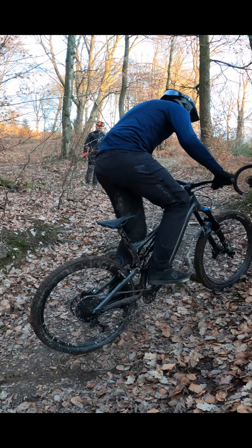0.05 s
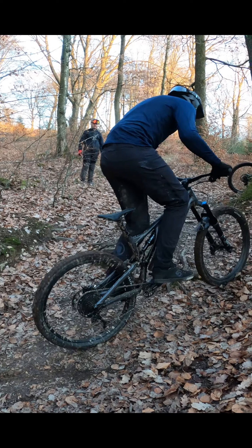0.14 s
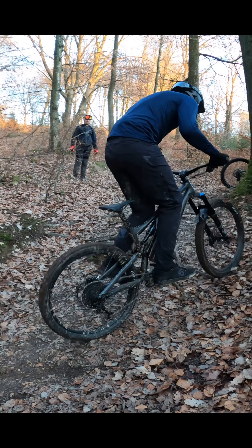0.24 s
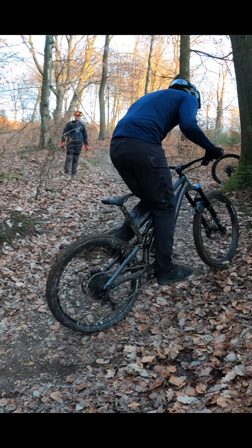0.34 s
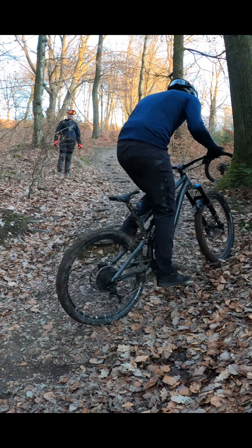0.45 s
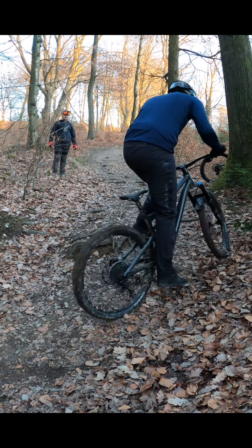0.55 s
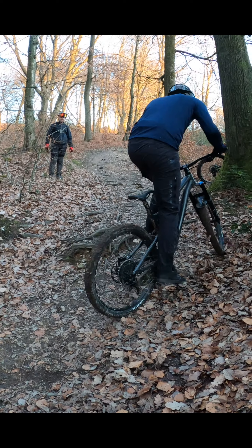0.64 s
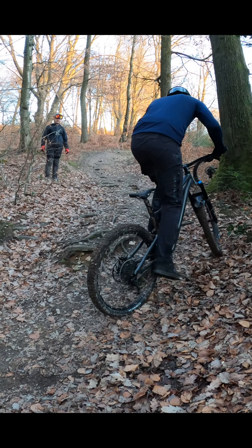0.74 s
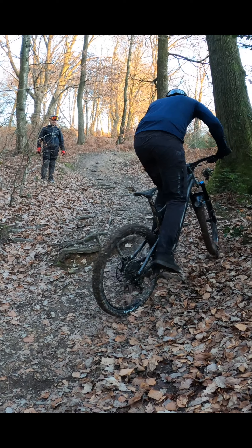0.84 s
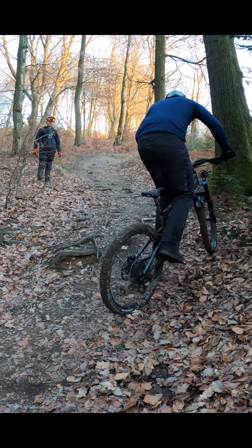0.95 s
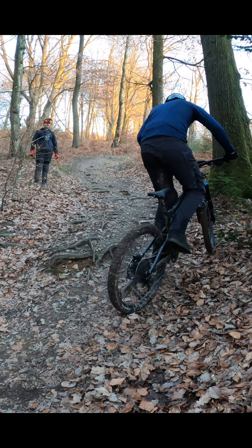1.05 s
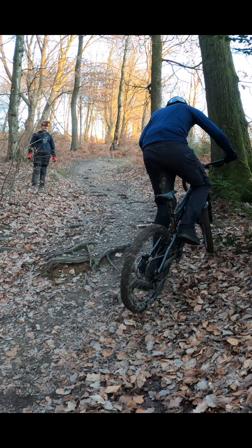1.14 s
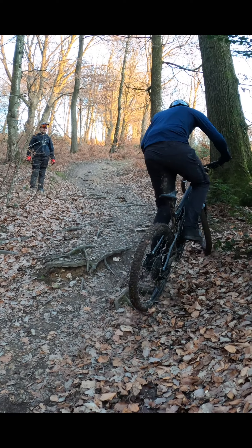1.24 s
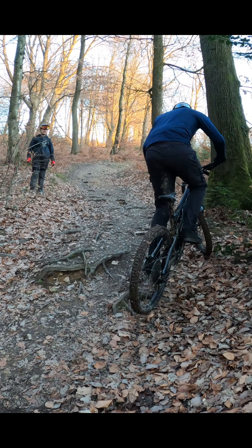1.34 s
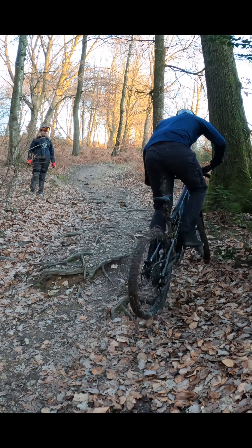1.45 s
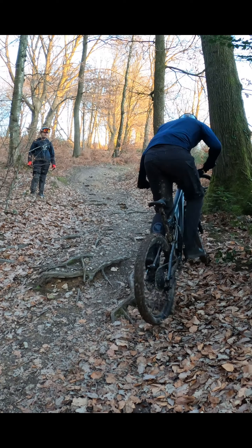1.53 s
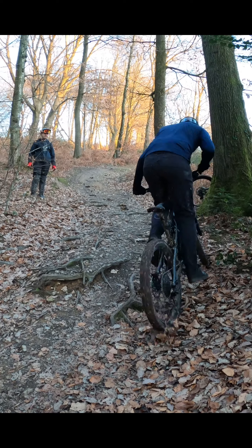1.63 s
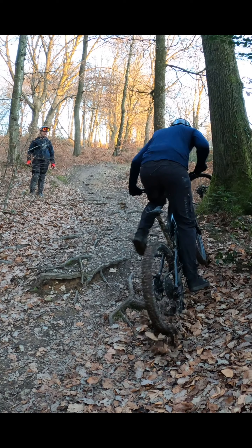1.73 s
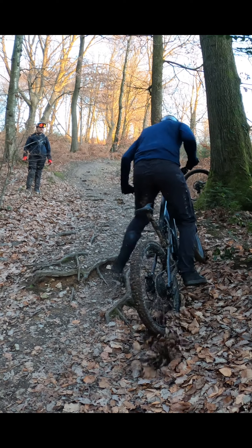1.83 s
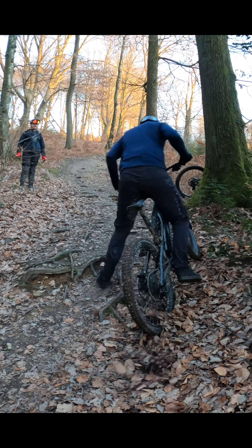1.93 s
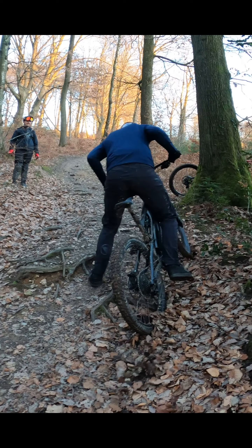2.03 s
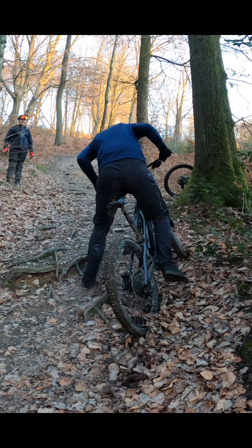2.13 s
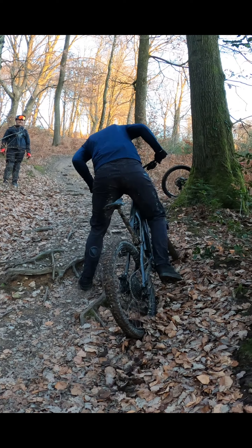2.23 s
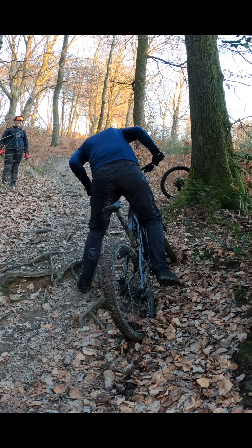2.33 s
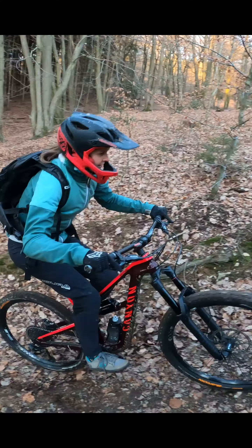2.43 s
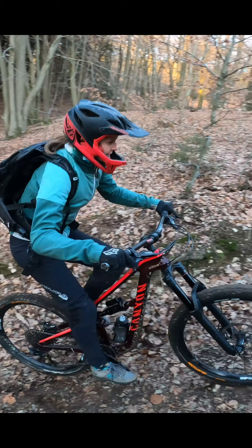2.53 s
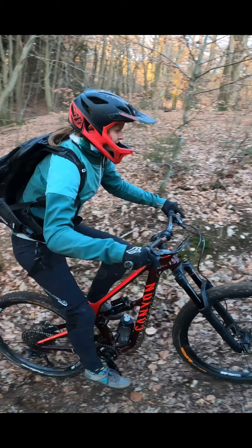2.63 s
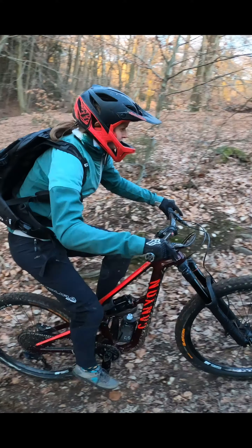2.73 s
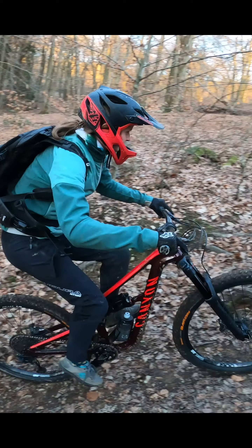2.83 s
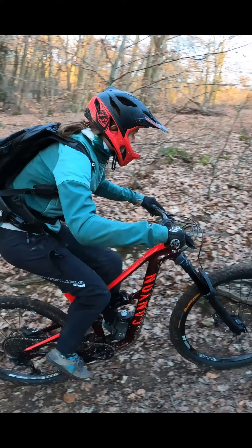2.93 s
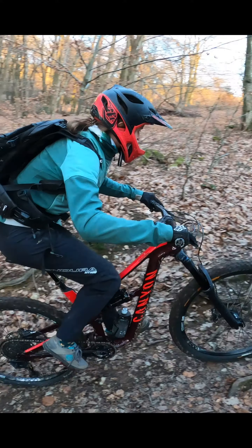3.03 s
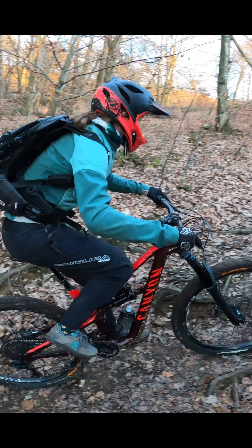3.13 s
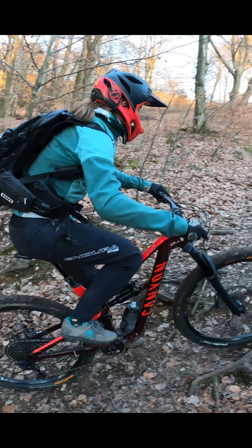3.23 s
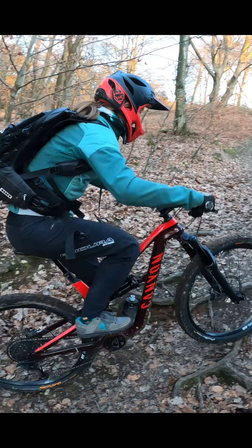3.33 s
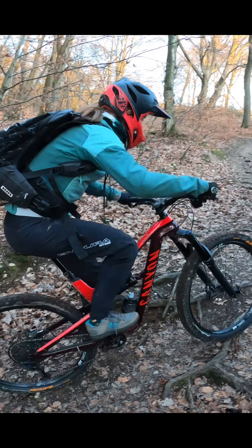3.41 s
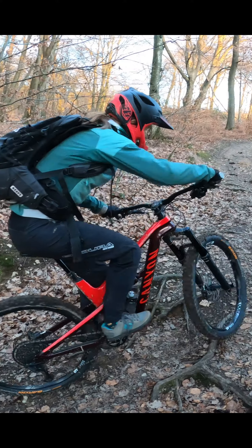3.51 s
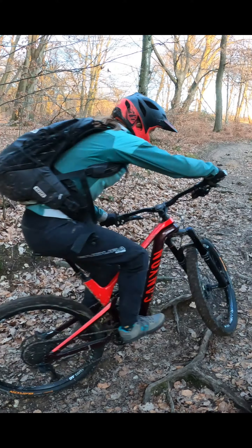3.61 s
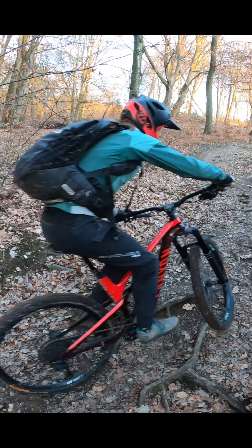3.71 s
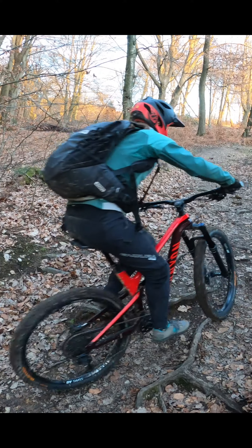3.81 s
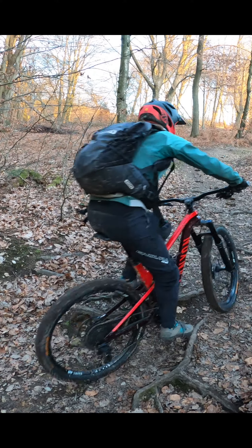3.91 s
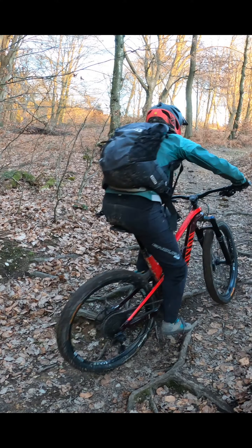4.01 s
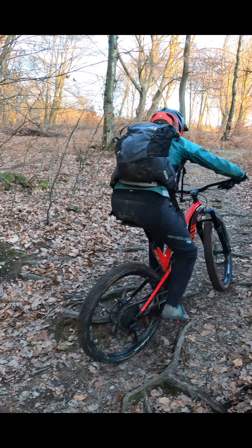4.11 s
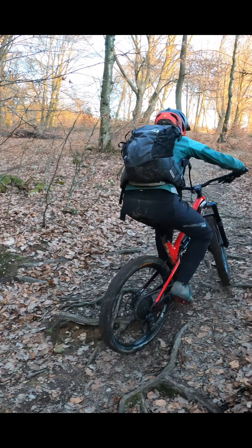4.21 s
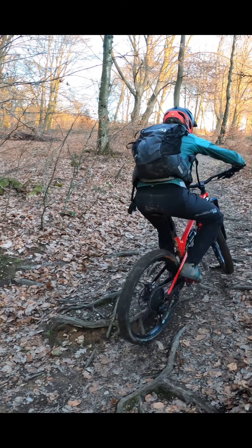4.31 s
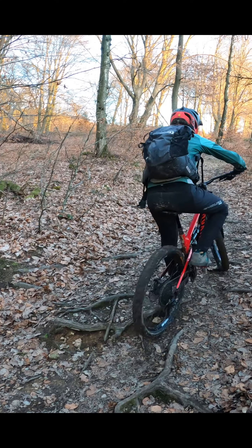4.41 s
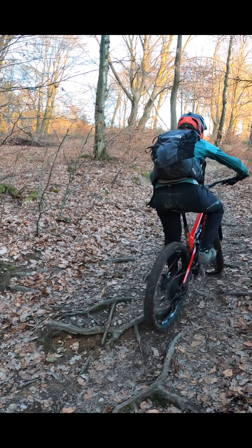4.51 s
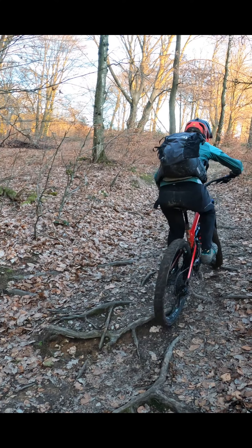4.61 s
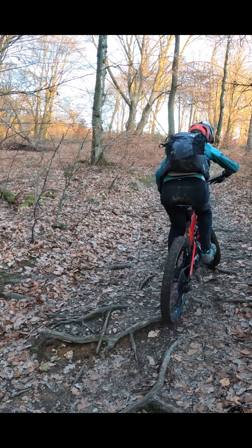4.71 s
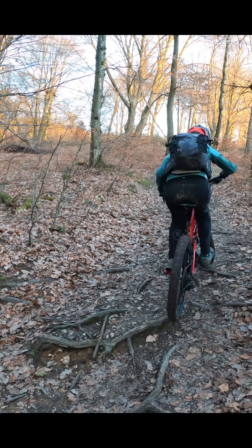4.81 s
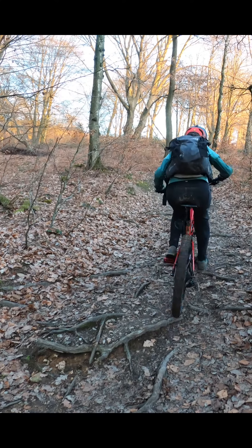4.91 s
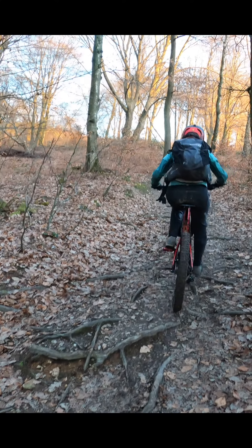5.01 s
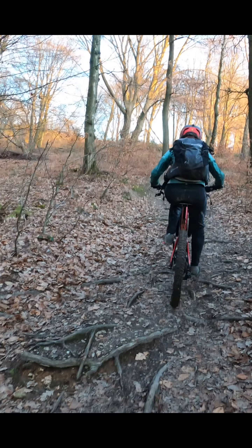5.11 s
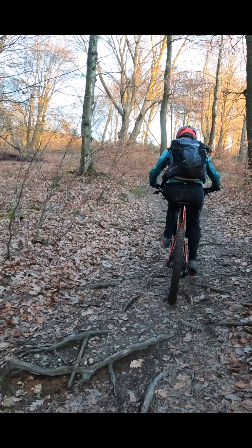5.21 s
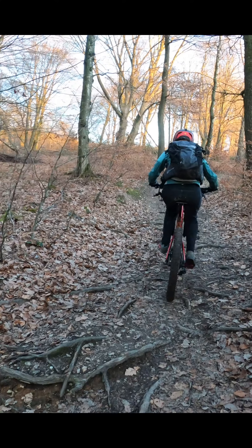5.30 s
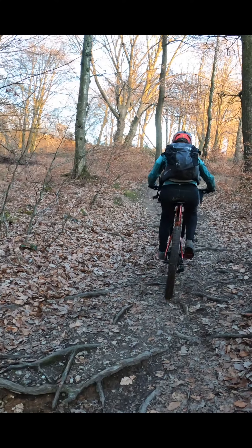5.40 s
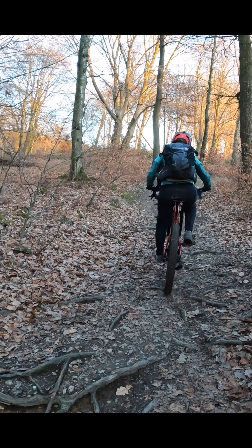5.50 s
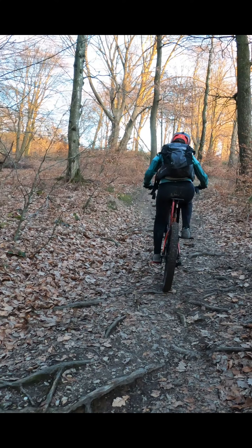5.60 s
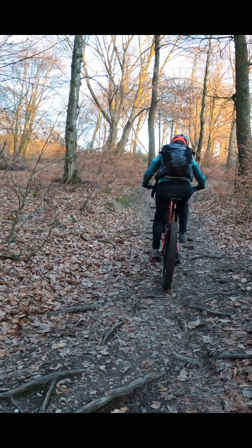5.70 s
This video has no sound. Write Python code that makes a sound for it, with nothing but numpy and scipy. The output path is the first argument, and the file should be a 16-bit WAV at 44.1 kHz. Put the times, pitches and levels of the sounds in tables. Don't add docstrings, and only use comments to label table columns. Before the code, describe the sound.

Close tyres crackle over dry leaves and dirt; a rear wheel slips with a drumming tear, then a second, quieter bike rolls past with snapping twigs.

```python
import sys
import numpy as np
from scipy import signal
from scipy.fft import rfft, irfft
from scipy.io import wavfile
from scipy.ndimage import uniform_filter1d

SR = 44100
rng = np.random.default_rng(int(sys.argv[2]) if len(sys.argv) > 2 else 0)


def digitize_waveform(pressure):
    field = np.atleast_2d(pressure).T
    bounded = np.clip(field, -1, 1)
    quanta = np.round(bounded * 32767).astype(np.int16)
    wavfile.write(sys.argv[1], SR, quanta)


def volts(x):
    e = np.asarray(x, float) / 20
    return 10 ** e


N = 253575
TIME = np.arange(N) / SR
SECOND = TIME >= 2.479
TOP_HZ = 15800


def evened(x):
    return x / np.sqrt(np.mean(x ** 2) + 1e-20)


def track(rows):
    s, *columns = np.transpose(rows)
    return [np.interp(TIME, s, c) for c in columns]


def fine(x):
    return np.interp(TIME * 1000, np.arange(len(x)), x)


def colour(x, points, lo_hz=0, hi_hz=3e4, fade=0.14):
    hz = np.fft.rfftfreq(len(x), 1 / SR) + 1
    f, db = np.transpose(points)

    def above(edge_hz):
        return np.clip(.5 + np.log(hz / (edge_hz + 1)) / (2 * fade), 0, 1)

    gain = volts(np.interp(np.log(hz), np.log(f + 1), db))
    return irfft(rfft(x) * gain * above(lo_hz) * (1 - above(hi_hz)), len(x))


def add(mix, s, sound):
    part = mix[round(s * SR):][:len(sound)]
    part += sound[:len(part)]


def ring(x, hz, width_hz):
    return signal.lfilter(*signal.iirpeak(np.clip(hz, 30, 2e4), max(hz / width_hz, .3), SR), x)


def steep_ring(x, hz, width_hz):
    return ring(ring(x, hz, width_hz), hz, width_hz)


def drift(first, second):
    return evened(uniform_filter1d(uniform_filter1d(rng.standard_normal(N), first), second))


def swell(start, length, attack, growth_db, release_db):
    t = np.arange(0, N / SR + .01, .001) - start
    grown = np.clip(t / max(length, .01), 0, 1) - 1
    decay_db = release_db * np.maximum(t - length, 0)
    return np.clip(t / max(attack, .002), 0, 1) * volts(growth_db * grown - decay_db)


def heap(bed, rows, level_db, shape):
    power = sum((volts(db) * swell(*row[:2], *shape)) ** 2 for row, db in zip(rows, level_db))
    return np.sqrt(bed ** 2 + fine(power))


def grains(per_s, spread_db, lo_hz, hi_hz, cycles, bed, clump_db, count=20):
    clump = drift(420, 260)
    size = volts(spread_db * np.minimum(rng.exponential(1, N), 4))
    size = size * (rng.random(N) < per_s / SR)
    kind, out = rng.integers(0, count, N), np.zeros(N)
    t = np.arange(300) / SR
    for k, hz in enumerate(np.geomspace(lo_hz, hi_hz, count)):
        crack = np.sin(2 * np.pi * hz * t) * np.exp(-t * hz / cycles)
        crack = crack / np.linalg.norm(crack) * np.sqrt(hz)
        out += signal.oaconvolve(size * (kind == k), crack)[:N]
    rustle = bed * rng.standard_normal(N)
    return evened((evened(out) + rustle) * volts(clump_db * clump))


def burst(t60, rise_s, tick):
    t = np.arange(4000) / SR
    decay = volts(-60 * t / max(t60, .005)) + tick * np.exp(-t / 0.00074)
    return rng.standard_normal(len(t)), np.minimum(t / rise_s, 1) * decay


def tone(rows, flutter_db, waver):
    hz, db = track(rows)
    flutter, wander = drift(200, 150), drift(200, 150)
    turns = np.cumsum(hz * (1 + waver * wander)) / SR
    sounding = (TIME > rows[0][0]) * (TIME < rows[-1][0])
    return np.sqrt(2) * volts(db + flutter_db * flutter) * np.sin(2 * np.pi * turns) * sounding


def pops(rows, least_cycles):
    out = np.zeros(N)
    for (s, db, hz), turn in zip(rows, rng.random(len(rows))):
        cycles = least_cycles * max(hz / 3500, 1) ** .5
        u = np.arange(4400) / SR * hz / cycles
        envelope = least_cycles / cycles * 2 * u * np.exp(1 - 2 * u)
        wave = np.sin(2 * np.pi * (u * cycles + turn))
        add(out, s - .5 * cycles / hz, volts(db - 5.0) * envelope * wave)
    return out


# f/Hz, level/dB
GUST_COLOUR = [(11, -44), (18, 0.5), (32, -3), (48, 1), (59, -6.5), (76, 5), (90, -12), (120, -42),
               (200, -120)]
# t/s, length/s, level/dB
GUSTS = [(0.0, 0.11, -44), (.48, 0.14, -55.5), (1.013, .05, -57), (1.2, 0.076, -57), (1.378, 0.062, -63),
         (1.553, 0.53, -54), (1.994, 0.24, -52.5), (2.48, 0.26, -44.5), (2.852, 0.039, -45),
         (2.986, 0.14, -48.5), (3.245, 0.37, -49), (3.758, 0.52, -48.5), (4.214, 0.41, -50.5),
         (4.62, 0.25, -52.5), (5.025, 0.036, -56), (5.21, 0.1, -49), (5.47, 0.088, -55),
         (5.698, 0.063, -59)]
GUST_SHAPE = 0.03, 0.76, 96


def wind():
    rumble = evened(colour(rng.standard_normal(N), GUST_COLOUR, 0, 64.4, 0.1))
    return heap(volts(-66), GUSTS, [r[2] for r in GUSTS], GUST_SHAPE) * rumble


def trees(x, t60):
    t = np.arange(6000) / SR
    tail = rng.standard_normal(len(t)) * volts(-60 * t / t60) * (t > .004)
    return signal.oaconvolve(x, tail / np.linalg.norm(tail))[:N]


# t/s, f/Hz, level/dB
SQUEAK = [
    (.455, 2680, -62),
    (.472, 2860, -50),
    (.492, 3020, -49),
    (.51, 2960, -50),
    (.52, 2740, -52),
    (.535, 2450, -55),
    (.545, 2330, -64),
]


def squeak():
    return tone(SQUEAK, flutter_db=4.5, waver=.012)


# t/s, level/dB
ROLL = [
    [(0.0, -44.5), (.2, -50), (.44, -49), (.75, -46.5), (1.3, -48), (1.5, -50.5), (1.86, -43.5),
     (2.15, -44.5), (2.38, -51), (2.476, -56)],
    [(2.481, -49.5), (2.72, -49), (2.95, -56.5), (3.1, -53.5), (3.8, -55.5), (4.58, -54.5), (4.98, -46),
     (5.26, -54.5), (5.75, -56.5)],
]


def rolling():
    return track(sum(ROLL, []))[0]


# f/Hz, level/(dB per Hz)
LITTER = [
    [(150, -35), (250, 22), (399, 13), (450, 9), (625, 10), (681, 9.5), (1110, 11), (1340, 2), (1960, -1.5),
     (3770, 1), (5520, -2.5), (8650, -5.5), (12400, -16.5), (15600, -28)],
    [(150, -30), (250, 0), (297, 23.5), (442, -9.5), (782, -32), (1160, -10), (1510, -16.5), (2020, -15.5),
     (3060, -14.5), (4890, -20.5), (7270, -39.5), (8070, -36.5), (12400, -49), (15600, -59)],
]
# t/s, length/s, crunch level/dB, dryness/dB
DRIFTS = [(0.0, 0.11, -46, -12), (0.28, 0.075, -46, -14), (0.494, 0.18, -48, -9.5),
          (0.809, 0.189, -40, -12.5), (1.037, 0.3, -46.5, -11), (1.523, .26, -35, -14),
          (1.935, 0.12, -37.5, -9.5), (2.706, 0.015, -53, -18), (2.858, 0.026, -49, -4),
          (2.988, 0.041, -52.5, -4), (3.303, 0.046, -48.5, -12), (3.828, 0.27, -52.5, -9.5),
          (4.075, 0.18, -56, -11), (4.347, 0.029, -56.5, -1), (4.408, 0.09, -52.5, -12),
          (4.583, 0.2, -49.5, -12.5), (4.972, 0.15, -46.5, -6), (5.113, 0.12, -47, -10.5),
          (5.412, 0.13, -54.5, -28), (5.663, 0.026, -45.5, -11)]
DRIFT_SHAPE = 0.054, 0.91, 370


def leaves(crackle, grip):
    _, scrape, _, slip = grip
    grit = scrape * (1 - np.clip(2 * slip, 0, 1))
    roll = volts(rolling())
    fizz_bed = roll * volts(np.where(SECOND, -8.5, -12))
    crunchy = heap(roll, DRIFTS, [r[2] for r in DRIFTS], DRIFT_SHAPE)
    fizzy = heap(fizz_bed, DRIFTS, [r[2] + r[3] for r in DRIFTS], DRIFT_SHAPE)
    out = np.zeros(N)
    for litter, here in zip(LITTER, (~SECOND, SECOND)):
        low = evened(colour(crackle, litter, 370, 1300, .2))
        crunch = evened(colour(crackle, litter, 1300, 5500, .2))
        fizz = evened(colour(crackle, litter, 5500, TOP_HZ))
        out += here * (grit * low + crunchy * crunch + fizzy * fizz)
    return out


# t/s, peak level/dB, f/Hz, relative fizz/dB
SNAPS = [(0.055, -51, 3110, -22), (0.193, -44, 4400, -22), (0.2264, -39, 4500, -24),
         (0.2847, -40, 4280, -30), (.33, -36, 4300, -27), (0.416, -33, 2450, -30),
         (0.584, -38, 2250, -19), (0.7156, -35, 3680, -5), (.7966, -45, 2690, -18),
         (0.9059, -21.5, 1880, -12), (0.931, -24, 1540, -26), (1.064, -36, 2790, -4),
         (1.185, -26, 2900, -21), (1.245, -48, 2870, -26), (1.396, -35.5, 3000, -40),
         (1.4795, -50, 3150, -27), (1.5546, -48, 1810, -26), (1.7949, -24, 3970, -32),
         (2.044, -22.5, 2040, -6.5), (2.105, -26, 4200, -30), (2.1225, -27.5, 3200, -25),
         (2.4813, -47, 3000, -4), (2.5557, -35.5, 2660, -17), (2.653, -29.5, 2980, -28),
              (2.7154, -29, 2040, -22), (2.725, -31, 2600, -6.5), (2.7978, -31, 3500, -4),
              (2.8754, -35, 2790, -20), (3.036, -35, 1830, -22), (3.0879, -47, 2330, -3),
              (3.3355, -42, 3535, -26), (3.617, -41.5, 1690, -27), (3.6615, -31, 1110, -25),
              (3.932, -30.5, 5300, -12), (3.9887, -39, 3750, -21), (4.039, -31.5, 1830, -22),
              (4.064, -38, 2400, -24), (4.104, -37, 2650, -23), (4.135, -31.5, 2920, -4),
              (4.1957, -42, 2640, -21), (4.239, -32.5, 2800, -5.5), (4.282, -40, 3440, -22),
              (4.338, -39, 3220, -23), (4.371, -35.5, 2770, -33),
         (4.521, -33, 2680, -8.5), (4.671, -29.5, 2540, -11), (5.0642, -27, 4940, -33),
             (5.074, -28.5, 3800, -5.5), (5.097, -37, 3000, -21), (5.121, -27, 1480, -22),
             (5.161, -24.5, 1900, -12), (5.171, -21.5, 1670, -7.5), (5.183, -38, 2470, 5),
             (5.2038, -22.5, 1600, -13), (5.21, -32, 4860, -20), (5.216, -42, 3500, 1),
             (5.231, -45, 2970, -14), (5.249, -44, 2000, -11), (5.322, -34, 1670, -18),
             (5.333, -46, 1830, -2), (5.366, -43, 3160, -2), (5.417, -35.5, 3470, -29),
             (5.447, -41, 2800, -30), (5.685, -37, 2860, -24)]


def snaps():
    out = np.zeros(N)
    for s, db, hz, fizz_db in SNAPS:
        noise, shape = burst(0.059, 0.0026, 0.71)
        noise[90] += 5.4 * np.sign(noise[90])
        fizz_shape = uniform_filter1d(np.roll(shape, 30), 60)
        fizz = evened(colour(noise, LITTER[1], 5900, TOP_HZ)) * fizz_shape
        body = .7 * evened(ring(noise, hz, 0.3 * hz)) + 1.1 * evened(ring(noise, 3300, 3300))
        body = ring(shape * body, hz, 2200)
        add(out, s - .0013, volts(db - 10.5) * (body + volts(fizz_db + 3.5) * fizz))
    return out


# t/s, peak level/dB, f/Hz
FIBRES = [(0.0578, -39, 9010), (0.0578, -30, 3850), (0.0669, -38, 8170), (0.1957, -22.5, 4370),
          (0.2286, -30, 3730), (0.229, -36, 9360), (0.2851, -23, 4170), (0.4179, -34, 3140),
          (0.6552, -26, 8250), (0.717, -35, 8420), (1.002, -29, 3170), (0.8108, -27, 2840),
          (0.9355, -22, 3770), (1.065, -34, 7870), (1.0762, -21.5, 2930), (1.1241, -25, 7700),
          (0.896, -22, 3000), (1.1873, -18, 3170), (0.981, -19, 3200), (1.2468, -28, 3200),
          (1.397, -28, 3130), (1.4088, -29, 3990), (1.4808, -30, 3460), (1.5368, -41, 9100),
          (1.7957, -16, 3860), (2.1073, -26, 8960), (2.1073, -20, 3920), (2.2329, -44, 8160),
          (2.2763, -30, 8730), (2.2803, -34, 3360), (2.5336, -33, 8340), (2.5567, -34, 2420),
          (2.6527, -36, 3300), (2.7604, -39, 2500), (2.8555, -33, 2360), (2.9051, -30, 3510),
          (2.9152, -36, 2930), (2.9954, -37, 8500), (3.0666, -44, 8360), (3.0895, -39, 8270),
          (3.317, -37, 8830), (4.0397, -25, 2470), (4.1056, -29, 2920), (4.1364, -40, 8770),
          (4.1364, -28, 3310), (4.3414, -27, 3380), (4.521, -34, 7770), (4.5226, -23, 2750),
          (4.9155, -27, 8150), (5.1221, -28, 2860), (5.1624, -38, 2430), (5.1628, -36, 8600),
          (5.1726, -22, 8910), (5.173, -22, 2950), (5.1868, -15, 9360), (5.2043, -33, 8370),
          (5.2104, -23, 9780), (5.2498, -42, 9500), (5.3215, -47, 7940), (5.3351, -36, 8520),
          (3.9275, -31, 3000), (3.888, -38, 7500), (3.945, -28, 2500), (4.03, -37, 3000),
               (4.071, -31, 1480), (4.195, -39, 2600), (4.376, -37, 3500), (3.9875, -33, 3470),
               (4.0447, -29, 2520), (4.0645, -25, 4970), (4.112, -28, 2500), (4.2465, -35.5, 2200),
               (4.2915, -28, 2500), (5.0515, -28, 3820), (5.0652, -34, 5000), (5.074, -22, 4500),
               (5.0855, -24, 2500), (5.097, -26, 3000), (5.1028, -23, 3500), (5.1143, -31, 2200),
               (5.139, -36, 10500), (5.1775, -30, 1800), (5.189, -23, 8500), (5.2075, -27, 2800),
               (5.2172, -23, 10000), (5.2335, -32, 9000), (5.3666, -34, 3330), (5.3672, -43, 8350),
               (5.4186, -37, 3060), (5.4486, -28, 2610)]


def fibres():
    return pops(FIBRES, least_cycles=1.3)


# t/s, peak level/dB
STICK = [
    (2.7582, -17),
    (2.7601, -14),
]
# f/Hz, level/dB, t60/s
STICK_MODES = [(282, -7.5, 0.097), (507, -1.5, 0.015), (750, -1.5, 0.017), (1230, 1, 0.0088)]


def stick():
    out, t = np.zeros(N), np.arange(4000) / SR
    dull = signal.butter(3, 4800, fs=SR)
    for s, db in STICK:
        noise, shape = burst(0.024, 0.00031, 2.8)
        crack = volts(-5.5) * shape * evened(ring(noise, 1600, 3800))
        for hz, mode_db, t60 in STICK_MODES:
            detuned_hz = hz * rng.uniform(0.89, 1.36)
            crack = crack + volts(mode_db - 60 * t / t60) * np.sin(2 * np.pi * detuned_hz * t)
        add(out, s, volts(db - 7.5) * signal.lfilter(*dull, crack))
    return out


# t/s, peak level/dB, f/Hz, upper ring/dB, t60/s
KNOCKS = [(0.188, -35, 430, -12, 0.007), (0.526, -40.5, 1390, -5.5, 0.049), (1.184, -39, 1230, -28, 0.03),
          (1.549, -38.5, 150, 8.5, 0.15), (1.577, -36.5, 222, 12.5, 0.022), (1.602, -25.5, 181, 7, 0.033),
          (1.672, -22, 223, -0.5, 0.083), (1.977, -21, 400, -17, 0.015), (2.007, -28.5, 500, -17, 0.029),
          (2.054, -27, 300, -18, .015), (2.019, -15, 192, -32, 0.036), (2.11, -43, 760, -10, 0.1),
          (2.149, -46, 770, -16, 0.16), (2.354, -32, 320, -11, 0.028), (2.376, -35, 244, -35, 0.048),
          (2.555, -59, 217, -8, 0.039), (3.299, -33, 201, -3, 0.015), (3.662, -41, 225, -8, 0.018),
          (4.102, -38.5, 1040, -22, 0.046), (4.243, -34.5, 166, -3, 0.017), (4.558, -44, 150, -20, 0.086),
          (5.408, -27.5, 1010, -13, 0.0071), (5.632, -42, 227, -12, 0.054)]


def knocks():
    out = np.zeros(N)
    for s, db, hz, upper_db, t60 in KNOCKS:
        noise, shape = burst(2.3 * t60, 0.003, 0.41)
        noise[100] += 8.64
        body = evened(steep_ring(noise, hz, 0.87 * hz))
        upper = volts(upper_db) * evened(steep_ring(noise, 870, 540))
        add(out, s, volts(db - 3.5) * shape * (body + upper))
    return out


# t/s, peak level/dB, f/Hz
CLODS = [(.008, -35.5, 255), (.1909, -45, 330), (.415, -32, 1220), (.5075, -36, 825), (.535, -36, 1490),
         (.5581, -51, 980), (1.556, -41, 900), (1.5805, -22, 930), (1.608, -14.5, 935), (1.676, -19, 580),
         (1.705, -25, 850), (1.752, -16.5, 1140), (1.772, -16, 1010), (1.793, -34, 600), (1.81, -25, 218),
         (1.981, -24.5, 216), (2.0106, -25, 620), (2.026, -15.5, 197), (2.041, -17, 329), (2.147, -38, 800),
         (2.175, -32, 750), (2.24, -39, 254), (2.358, -28, 332), (2.359, -30.5, 770), (2.385, -29, 222),
         (2.885, -32.5, 1320), (3.3035, -31, 720), (3.42, -41, 800), (3.666, -35.5, 406),
         (4.0459, -35, 1070), (4.6171, -39, 775), (4.986, -30.5, 940), (5.3667, -42, 820),
         (5.6363, -53, 730)]


def clods():
    return pops(CLODS, least_cycles=2.16)


# t/s, peak level/dB, f/Hz
BUMPS = [(2.064, -21, 183), (2.082, -26.5, 109), (2.155, -47, 850), (2.19, -32, 795), (2.4, -40, 110),
         (3.308, -30, 142), (3.869, -46, 104), (4.2, -40, 90), (4.331, -39, 102), (4.564, -35, 84),
         (5.37, -47, 80), (.1905, -31.5, 430), (1.549, -27, 800)]


def bumps():
    return pops(BUMPS, least_cycles=1.23)


# t/s, f/Hz, level/dB
SPRING = [
    (2.125, 532, -60),
    (2.14, 512, -47),
    (2.17, 448, -52.5),
    (2.23, 428, -60),
]


def spring():
    return tone(SPRING, flutter_db=3, waver=.012)


# t/s, f/Hz, level/dB
FRAME = [
    (1.73, 461.5, -48),
    (1.75, 461.5, -45),
    (1.785, 461.2, -41),
    (1.86, 461.2, -52),
    (1.9, 461.1, -57),
    (1.94, 461, -66),
]


def frame():
    return tone(FRAME, flutter_db=2.6, waver=0)


# t/s, length/s, thump level/dB, scrape level/dB
SCUFFS = [(0.0, 0.11, -51, -51.5), (0.366, 0.031, -63, -55), (0.59, 0.041, -56, -58),
          (0.756, 0.017, -55, -56), (0.838, 0.11, -57, -50), (1.09, 0.25, -63, -60),
          (2.145, 0.14, -58, -60), (2.357, 0.022, -44, -48.5), (2.489, 0.28, -47.5, -47),
          (2.805, 0.058, -47.5, -44.5), (3, 0.17, -53, -53), (3.29, 0.093, -50, -44),
          (3.49, 0.039, -66, -51.5), (3.65, 0.038, -48, -73), (3.913, 0.052, -47, -46.5),
          (4.166, 0.2, -49, -51.5), (4.604, 0.12, -53, -42.5), (4.92, 0.2, -57, -45.5),
          (5.248, 0.023, -73, -44), (5.448, 0.19, -63, -43.5)]
SCUFF_SHAPE = 0.0067, 1.6, 123
# t/s, length/s, thump level/dB, tearing level/dB, starting rate/(knobs per s)
SKIDS = [
    (1.536, .255, -31.5, -24, 86),
    (1.984, .06, -37.5, -23, 112),
]
# attack/s, growth/dB, release/(dB per s)
SKID_THUMP, SKID_TEAR = (0.051, -2.1, 200), (0.12, 1.8, 400)


def traction():
    grit = volts(rolling() + np.where(SECOND, 4, -11.5))
    lumps = volts(np.where(SECOND, -55, -57.5))
    thump = heap(lumps, SCUFFS, [r[2] for r in SCUFFS], SCUFF_SHAPE)
    scrape = heap(grit, SCUFFS, [r[3] for r in SCUFFS], SCUFF_SHAPE)
    rate, slip = np.full(N, 62.), 0.44 * SECOND
    for start, length, _, _, knobs in SKIDS:
        spinning_up = knobs + 150 * np.minimum(TIME - start, length)
        rate = np.where((TIME > start) & ~SECOND, spinning_up, rate)
        slip = slip + 0.44 * fine(swell(start, length + 0.038, 0.032, 0, 300))
    thump = heap(thump, SKIDS, [r[2] for r in SKIDS], SKID_THUMP)
    scrape = heap(scrape, SKIDS, [r[3] for r in SKIDS], SKID_TEAR)
    return thump, scrape, rate, np.clip(slip, 0, 1)


# f/Hz, level/(dB per Hz)
DIRT = [(30, -50), (50, 18), (95, -5), (150, -5), (215, -4.5), (270, -6.5), (340, -12.5), (450, -7),
        (650, -13.5), (950, -21), (1250, -12.5), (1700, 43)]


def soil(crackle, grip):
    push, scrape, rate, slip = grip
    wobble = drift(500, 1)
    strikes = np.diff(np.floor(np.cumsum(rate * (1 + 0.099 * wobble)) / SR), prepend=0)
    knobs = strikes * volts(rng.standard_normal(N))
    lumps = grains(900, 2.2, 85.0, 519, 2.5, 0.46, 0.65)
    thump = slip * evened(colour(knobs, DIRT, 61.0, 248, 0.03))
    thump = thump + (1 - slip) * evened(colour(lumps, DIRT, 75.4, 390, 0.083))
    thump = np.where(SECOND, 1.026 * steep_ring(thump, 250, 440), thump)
    torn = colour(crackle * volts(1.1 * wobble), DIRT, 478, 1010, 0.36)
    torn = torn + 0.17 * ring(crackle * volts(3.16 * wobble), 880, 470)
    tear = np.clip(1.02 * slip, 0, 1) * scrape * volts(-3.0) * evened(torn)
    return push * thump / np.hypot(slip, 1 - slip) + tear


# t/s, rate/(knobs per s), level/dB
GROWL = [
    (1.534, 81.4, -26),
    (1.582, 80, -45),
    (1.615, 101.5, -26.5),
    (1.642, 97, -38),
    (1.67, 108, -27),
    (1.705, 114, -30),
    (1.745, 129, -30),
    (1.805, 107, -37),
    (1.85, 100, -48),
]
# multiple of the knob rate, level/dB
GROWL_ORDERS = [(1, -8), (2, 0.5), (3, -14.5), (4, -27)]


def growl():
    rate, db = track(GROWL)
    uneven = drift(300, 200)
    turns = np.cumsum(rate * (1 + 0.011 * uneven)) / SR
    stack = sum(volts(k_db) * np.cos(2 * np.pi * round(k) * turns) for k, k_db in GROWL_ORDERS)
    to_ends = np.minimum(TIME - GROWL[0][0], GROWL[-1][0] - TIME)
    return np.sqrt(2) * volts(db + 1.5 * uneven) * stack * np.clip(to_ends / .03, 0, 1)


def scene():
    hits = snaps() + knocks() + stick()
    crackle = grains(3500, 4.2, 470, 15600, 1.5, 1.88, 1.25)
    grip = traction()
    mid = wind() + volts(-11.5) * trees(hits, 0.27) + hits
    mid = mid + leaves(crackle, grip) + soil(crackle, grip) + growl()
    mid = mid + fibres() + clods() + bumps()
    mid = mid + volts(5.5) * (frame() + .5 * squeak()) + spring()
    return np.array([mid, mid])


# f/Hz, level/dB
HOUSING = [(4600, -0.1), (5600, -1.5), (6500, 2), (7200, 2.5), (8300, 3), (9200, 1), (10500, 2.6)]
# f/Hz, level/dB
PORTS = [(60, -44), (500, -42), (2000, -40), (6000, -26), (10800, -25), (11200, -5), (13000, -2),
         (15000, -1.5)]
# f/Hz, level/(dB per Hz)
HISS = [(30, -1), (600, -6), (1500, -9.5), (4000, -9.5), (8000, -11), (11000, -5)]


def microphone(dry):
    mid = colour(dry.mean(0), HOUSING, 0, TOP_HZ, .005)
    z = signal.stft(mid, nperseg=128)[2]
    random_phase = np.exp(2j * np.pi * rng.random(z.shape))
    scattered = signal.istft(z * random_phase, nperseg=128)[1][:N]
    side = colour(1.2 * scattered - 0.23 * mid, PORTS)
    side += volts(-77.5) * evened(colour(rng.standard_normal(N), HISS, 0, 9900))
    return np.array([mid + side, mid - side])


def roll_off(x):
    return signal.sosfilt(signal.butter(12, 15800, fs=SR, output="sos"), x)


def record(dry):
    mix = microphone(dry)
    return roll_off(mix)


dry = scene()
out = record(dry)
digitize_waveform(out)
```